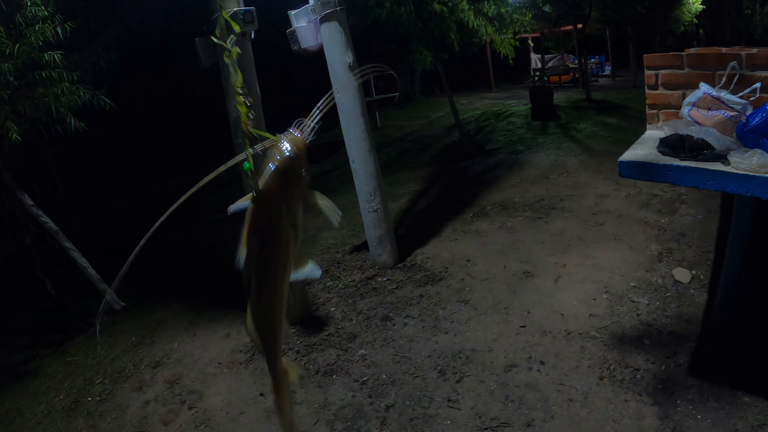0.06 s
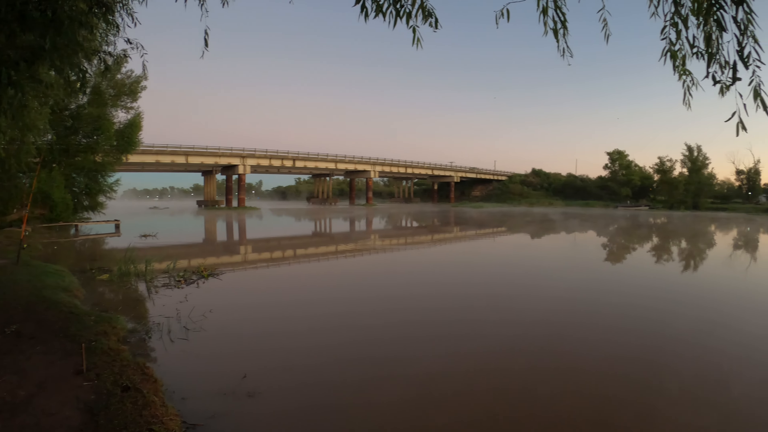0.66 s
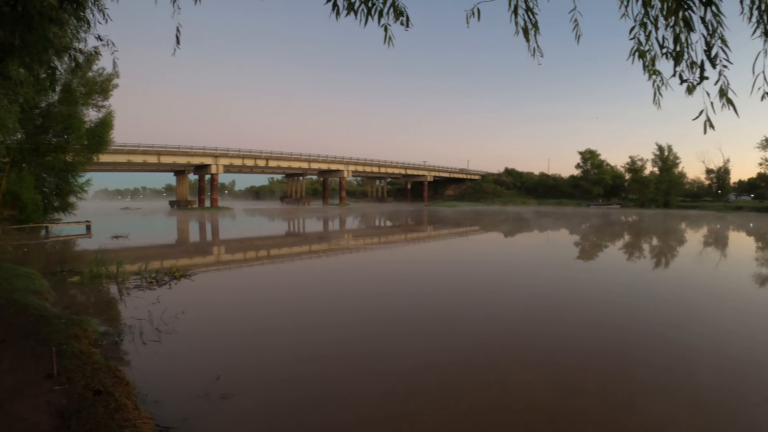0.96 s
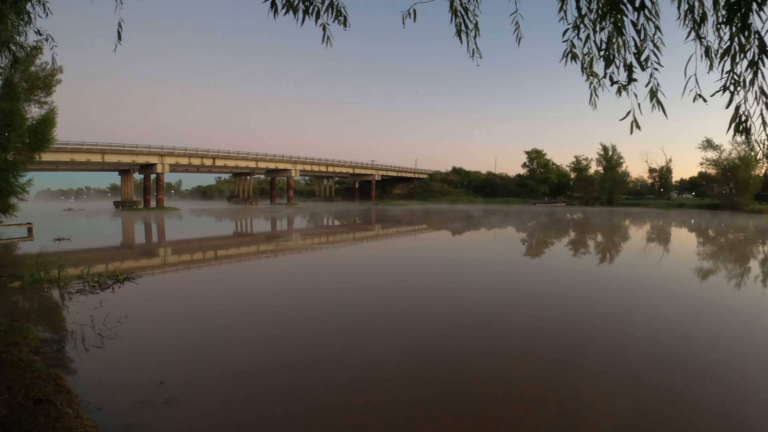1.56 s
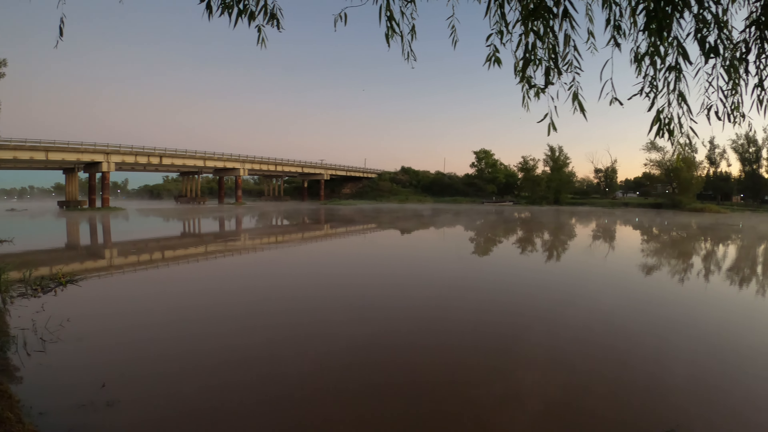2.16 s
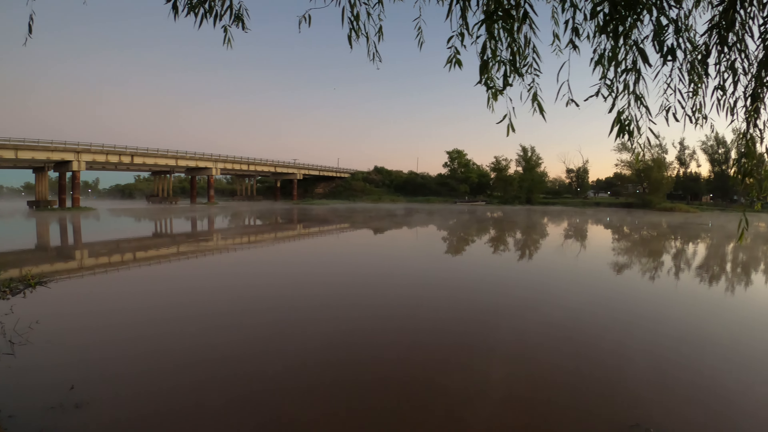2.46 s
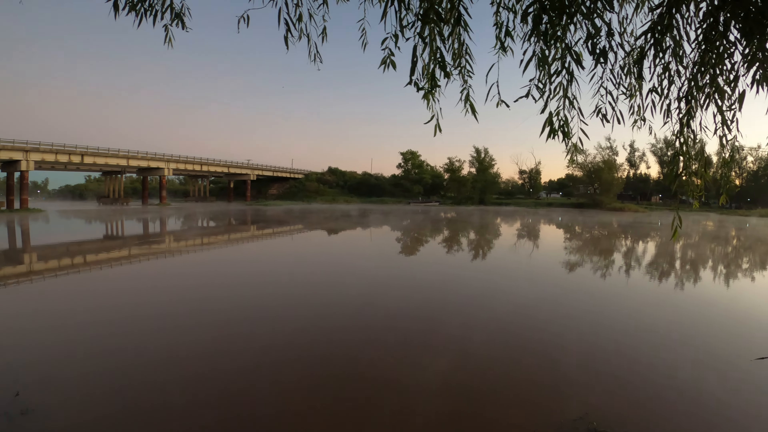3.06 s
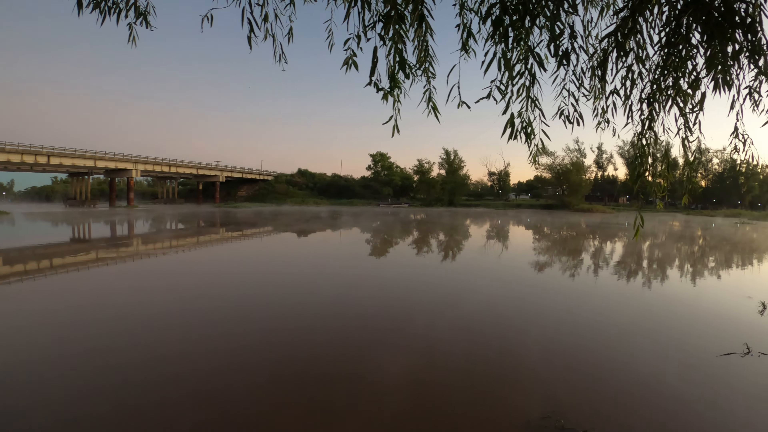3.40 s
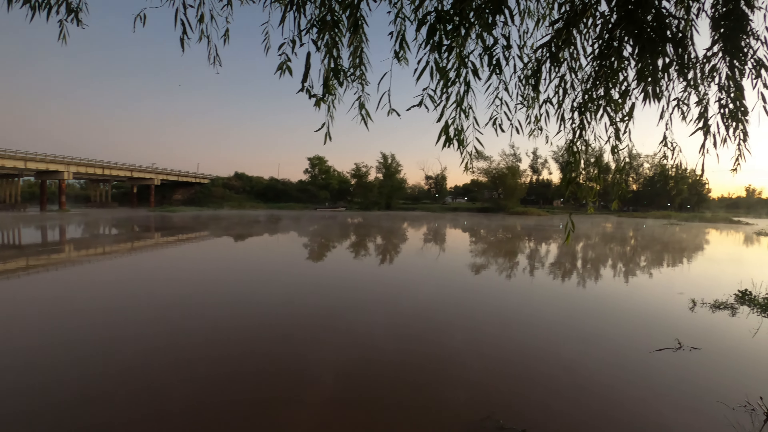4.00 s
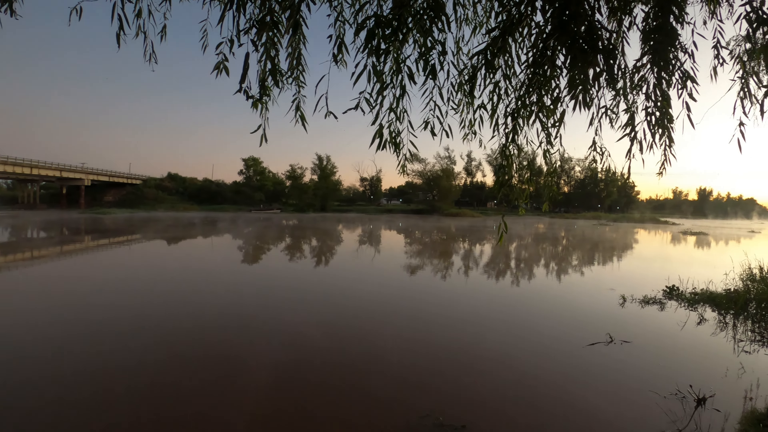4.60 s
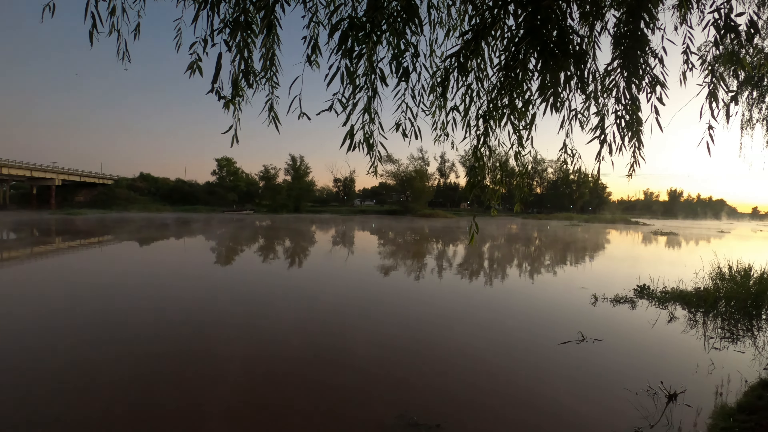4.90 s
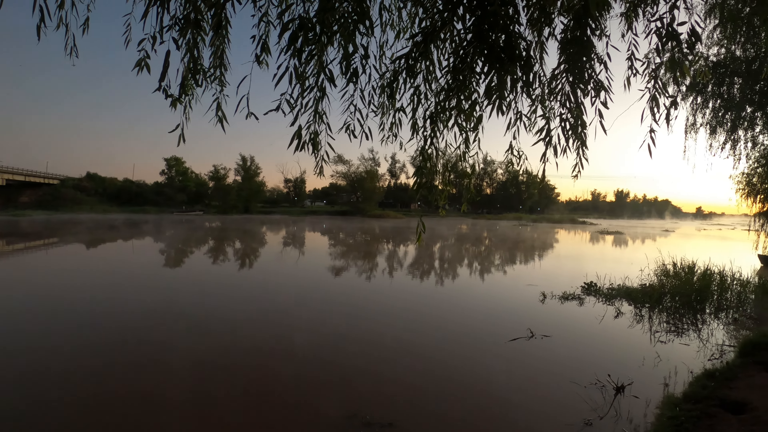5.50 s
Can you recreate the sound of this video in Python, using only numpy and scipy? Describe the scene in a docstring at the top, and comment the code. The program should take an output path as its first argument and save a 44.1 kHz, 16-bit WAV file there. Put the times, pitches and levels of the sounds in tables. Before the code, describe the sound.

A brief, deep rumble of close traffic cuts abruptly to a quieter riverbank. There a flock of small birds chatters continuously in the trees, with quick high chirps, raspy scolding calls and a few thin, clear whistles. Far traffic on a bridge adds a steady low rumble, engine drone and tyre hiss. Near the end the microphone is softly bumped twice.

```python
"""A river at dawn. A moment of close traffic rumble cuts to the bank, where a flock of small birds
chatters and scolds in the trees and a few others whistle thin, clear notes. Each note is a gliding
syrinx tone scattered by trunks and leaves; the scolds are high, patchy noise. Far traffic on a bridge
gives a low rumble, an engine drone and a tyre hiss. Late on, the microphone is bumped softly twice."""
import sys
import numpy as np
from scipy import signal
from scipy.fft import rfft, irfft, next_fast_len
from scipy.io import wavfile
from scipy.ndimage import uniform_filter1d

SR = 44100
rng = np.random.default_rng(int(sys.argv[2]) if len(sys.argv) > 2 else 0)


def dump(signal):
    """Clip the signal to [-1, 1] and save it as 16-bit WAV at the path in sys.argv[1]."""
    limited = np.clip(np.atleast_2d(signal).T, -1, 1)
    pcm = np.round(limited * 32767).astype(np.int16)
    wavfile.write(sys.argv[1], SR, pcm)


N = 249165
TIME = np.arange(N) / SR


def from_db(db):
    """Decibels to gain."""
    return 10 ** (np.asarray(db) / 20)


def unit_rms(x):
    """Scale to rms 1."""
    return x / np.sqrt(np.mean(x ** 2) + 1e-20)


def curves(rows):
    """Rows of (t/s, values...) to one per-sample curve for each value column."""
    times_s, *columns = np.transpose(rows)
    return [np.interp(TIME, times_s, column) for column in columns]


def add(out, start_s, sound):
    """Mix a sound in at start_s."""
    at = max(int(start_s * SR), 0)
    out[at:at + len(sound)] += sound[:max(N - at, 0)]


def band(x, low_hz, high_hz):
    """Butterworth band-pass."""
    return signal.sosfilt(signal.butter(2, [low_hz, high_hz], "band", fs=SR, output="sos"), x)


def coloured_noise(spectrum):
    """Steady noise shaped by rows of (f/Hz, density/dB); rms 1."""
    hz, db = np.transpose(spectrum)
    size = next_fast_len(N)
    bins_hz = np.maximum(np.fft.rfftfreq(size, 1 / SR), 1)
    gain = from_db(np.interp(np.log(bins_hz), np.log(hz), db, left=-120, right=-120))
    return unit_rms(irfft(rfft(rng.standard_normal(size)) * gain, size)[:N])


def drift(rate_hz):
    """Random line through rate_hz knots a second; rms 1."""
    knots = rng.standard_normal(N // 8)
    return unit_rms(np.interp(TIME * rate_hz, np.arange(len(knots)), knots))


def sine(pitch_hz):
    """Sine following a pitch curve; rms 1."""
    return np.sqrt(2) * np.sin(2 * np.pi * np.cumsum(pitch_hz) / SR)


# Close traffic spectrum: f/Hz, relative density/dB
CLOSE_SPECTRUM = [(15, -20), (25, -6), (45, 2), (70, -6.5), (100, -11.5), (140, -5), (190, -13.5),
                  (300, -16.5), (450, -31.5), (700, -26.5), (950, -31.5), (1500, -39), (2600, -47),
                  (4000, -54.5), (6400, -67.5), (8000, -72), (10000, -105)]


def close_traffic(level_db=-24.5):
    """Nearby traffic: steady noise, strongest in the deep bass."""
    return from_db(level_db) * coloured_noise(CLOSE_SPECTRUM)


def syllable(length_s, start_hz, middle_hz, end_hz, edge):
    """Parabolic pitch and tapered swell of one note; edge is each taper's share of the length."""
    progress = np.linspace(0, 1, int(length_s * SR))
    parabola = np.polyfit([0, .5, 1], [start_hz, middle_hz, end_hz], 2)
    swell = unit_rms(signal.windows.tukey(len(progress), 2 * edge))
    return np.polyval(parabola, progress), swell


def syrinx(notes, flutter_hz, shimmer_db, second_db, third_db, edge):
    """Gliding tones with two weak overtones; rasp makes pitch and strength flutter."""
    out, quiver, shimmer = np.zeros(N), drift(700), np.tanh(drift(450))
    for start_s, length_s, start_hz, middle_hz, end_hz, level_db, rasp in notes:
        pitch_hz, swell = syllable(length_s, start_hz, middle_hz, end_hz, edge)
        stretch = (rng.integers(N) + np.arange(len(pitch_hz))) % N
        unsteadiness = .15 + .85 * rasp ** 2   # even the clearest note quivers a little
        phase = 2 * np.pi * np.cumsum(pitch_hz + flutter_hz * unsteadiness * quiver[stretch]) / SR
        tone = np.sin(phase)
        tone += from_db(second_db) * np.sin(2 * phase) + from_db(third_db) * np.sin(3 * phase)
        tone *= from_db(shimmer_db * np.sqrt(rasp) * shimmer[stretch])
        add(out, start_s, from_db(level_db) * swell * unit_rms(tone))
    return out


def trees(calls, t60_s, wet_db):
    """Trunks and leaves scatter a dense, short tail, duller than the call."""
    t = TIME[:SR]
    envelope = from_db(-60 * t / t60_s) * (1 - np.exp(-t / .0017))
    tail = band(rng.standard_normal(SR), 800, 10000) * envelope
    tail /= np.sqrt(np.sum(tail ** 2) * SR / (2 * 8200))   # about unit gain in the passband
    return calls + from_db(wet_db) * signal.fftconvolve(calls, tail)[:N]


# Syllable shapes by name: start f / middle f, end f / middle f, rasp (0-1)
SYLLABLE_SHAPES = {"arch": (.89, 0.81, 0.59), "buzz": (0.75, 0.74, 0.928), "slur": (1.02, .88, 0.625),
                   "fall": (1.12, .88, .52), "rise": (0.8, 1.08, .45), "scoop": (1, 1.3, 0.34),
                   "sweep": (.82, 1.02, .15)}
# Nearest birds' chirps: t/s, length/s, middle f/Hz, level/dB, syllable name
NEAR_CHIRPS = [(0.379, .05, 5200, -55.5, "arch"), (0.408, .033, 6700, -59.5, "arch"),
               (0.437, 0.0522, 3884, -40.5, "arch"), (.44, .04, 4300, -47, "slur"),
               (0.479, .035, 3280, -44, "slur"), (0.501, .041, 3670, -43.5, "slur"),
               (0.613, 0.042, 4480, -51.5, "buzz"), (0.648, 0.029, 3850, -46.5, "slur"),
               (0.696, 0.036, 3530, -48.5, "fall"), (0.775, 0.066, 5390, -53.5, "arch"),
               (.84, 0.052, 4240, -43, "slur"), (0.903, 0.058, 3450, -44.5, "buzz"),
               (0.957, 0.038, 3170, -40, "scoop"), (0.962, .07, 5750, -58.5, "slur"),
               (0.984, 0.073, 4000, -45.5, "slur"), (1.049, 0.055, 3190, -45, "rise"),
               (1.057, 0.083, 4340, -51, "buzz"), (1.143, .06, 4090, -50, "buzz"),
               (1.216, .024, 3000, -44, "scoop"), (1.216, 0.041, 6080, -50, "arch"),
               (1.24, .08, 4380, -47.5, "sweep"), (1.283, 0.038, 6020, -53.5, "arch"),
               (1.309, .028, 4350, -40.5, "slur"), (1.37, 0.029, 3150, -48, "scoop"),
               (1.39, .06, 5600, -58, "fall"), (1.393, 0.056, 4400, -39, "sweep"),
               (1.515, 0.052, 4400, -50.5, "rise"), (1.551, 0.032, 3610, -47.5, "fall"),
               (1.599, 0.046, 4100, -48.5, "arch"), (1.643, .099, 3690, -50, "fall"),
               (1.758, 0.039, 4360, -43.5, "slur"), (1.811, .065, 3530, -44.5, "arch"),
               (1.836, 0.032, 4730, -43, "arch"), (1.909, 0.037, 3640, -46, "rise"),
               (2.053, 0.052, 4050, -49.5, "slur"), (2.114, 0.054, 3590, -47.5, "arch"),
               (2.2, .04, 4900, -59.5, "arch"), (2.27, .06, 5200, -54, "buzz"),
               (2.305, 0.037, 3600, -50, "slur"), (2.331, 0.06, 4850, -52.5, "slur"),
               (2.365, 0.055, 3700, -55, "buzz"), (2.417, 0.039, 3750, -48, "buzz"),
               (2.591, 0.072, 4120, -49.5, "arch"), (2.653, 0.076, 5150, -56, "buzz"),
               (2.66, .069, 3510, -54, "slur"), (2.762, 0.049, 3760, -50, "rise"),
               (2.876, 0.068, 3670, -49.5, "arch"), (2.893, 0.038, 5160, -47.5, "arch"),
               (2.925, 0.063, 4400, -50.5, "buzz"), (2.948, 0.021, 3680, -45, "rise"),
               (2.968, .03, 3550, -46, "slur"), (2.993, .028, 2950, -46.5, "scoop"),
               (3.027, .033, 3290, -48.5, "arch"), (3.103, 0.065, 5310, -54.5, "buzz"),
               (3.21, 0.035, 3850, -50.5, "rise"), (3.24, 0.049, 4420, -49, "fall"),
               (3.295, 0.03, 3460, -47, "arch"), (3.33, 0.031, 3130, -46.5, "scoop"),
               (3.389, 0.049, 4370, -48.5, "buzz"), (3.447, 0.07, 3620, -52, "buzz"),
               (3.535, .04, 4060, -54.5, "fall"), (3.624, 0.11, 3820, -48.5, "buzz"),
               (3.728, 0.0484, 3530, -47.5, "sweep"), (3.785, 0.041, 5270, -53, "arch"),
               (3.784, 0.06, 3900, -46.5, "arch"), (3.829, 0.08, 3490, -45, "slur"),
               (3.995, 0.046, 3850, -57.5, "arch"), (4.1, 0.044, 4040, -50.5, "arch"),
               (4.149, .031, 3460, -43.5, "scoop"), (4.175, 0.052, 4940, -55, "buzz"),
               (4.214, 0.029, 5150, -49, "arch"), (4.274, 0.054, 3810, -44.5, "slur"),
               (4.291, .044, 6000, -59.5, "slur"), (4.323, 0.054, 3200, -44.5, "slur"),
               (4.385, 0.036, 4200, -50, "slur"), (4.43, 0.038, 5000, -49.5, "arch"),
               (4.432, .07, 3600, -54.5, "buzz"), (4.523, 0.027, 3620, -45, "arch"),
               (4.546, 0.029, 3000, -45.5, "slur"), (4.626, 0.11, 3720, -51, "buzz"),
               (4.665, 0.081, 4930, -52, "arch"), (4.75, .083, 3660, -50, "buzz"),
               (4.827, 0.049, 3040, -45.5, "scoop"), (4.965, 0.033, 3310, -50, "fall"),
               (5.091, 0.042, 4350, -51.5, "sweep"), (5.121, 0.042, 3350, -48, "fall"),
               (5.175, 0.03, 3280, -49.5, "slur"), (5.286, .033, 3200, -52.5, "slur"),
               (5.349, .026, 3580, -50, "sweep"), (5.429, 0.066, 5170, -56, "arch"),
               (5.489, 0.082, 4380, -49.5, "arch"), (5.51, 0.046, 3280, -53, "rise"),
               (5.561, 0.043, 3520, -48.5, "arch")]


def near_flock():
    """The closest birds of the flock, heard through foliage."""
    notes = []
    for start_s, length_s, middle_hz, level_db, shape in NEAR_CHIRPS:
        start_ratio, end_ratio, rasp = SYLLABLE_SHAPES[shape]
        start_hz, end_hz = start_ratio * middle_hz, end_ratio * middle_hz
        notes.append((start_s, length_s, start_hz, middle_hz, end_hz, level_db, rasp))
    calls = syrinx(notes, flutter_hz=350, shimmer_db=4.5, second_db=-35, third_db=-48, edge=.22)
    return trees(calls, t60_s=.2, wet_db=-3)


# Far flock's slow swell, with one lull: t/s, level/dB
FAR_FLOCK_SWELL = [(.42, -47), (.52, -49), (.59, -53.5), (.72, -52), (.9, -50), (1.3, -50), (1.85, -45.5),
                   (2.05, -51.5), (2.42, -46.5), (2.55, -65), (2.66, -51), (2.95, -47), (3.55, -54.5),
                   (4.35, -47), (5.05, -53), (5.65, -54)]


def far_flock_level_db(near_calls, window_s=.062, share=.28):
    """Far birds join in with near ones: a slow swell plus a share of the near birds' swing in dB."""
    slow_db, = curves(FAR_FLOCK_SWELL)
    near_power = uniform_filter1d(near_calls ** 2, int(window_s * SR))
    near_db = 10 * np.log10(near_power + from_db(-59.5) ** 2)
    return slow_db + share * (near_db - near_db.mean())


def far_flock(level_db, count=520):
    """Many more birds chirp at random and blur together."""
    jitter, length, pitch, rise, fall, faintness, rasp = rng.random((count, 7)).T
    start_s = (np.arange(count) + jitter) / count * N / SR   # one chirp per time slot
    length_s = .02925 + .0483 * length
    middle_hz = 3150 * 1.55 ** (pitch ** 1.5)
    start_hz = middle_hz * (1.04 - .25 * rise)
    end_hz = middle_hz * (1.04 - .23 * fall)
    notes = zip(start_s, length_s, start_hz, middle_hz, end_hz, -6 * faintness, rasp)
    calls = syrinx(notes, flutter_hz=400, shimmer_db=5, second_db=-31, third_db=-46, edge=.3)
    return from_db(level_db) * unit_rms(trees(calls, t60_s=.078, wet_db=-2))


# Spectrum of the harsh calls: f/Hz, relative density/dB
SCOLD_SPECTRUM = [(4000, -6.5), (5000, 17), (6000, 9), (7200, 0.5), (8200, -5.5), (9200, -17.5),
                  (10500, -10.5), (12000, -32), (13500, -27), (15500, -38)]
# Harsh calls: t/s, length/s, level/dB, tilt/(dB/octave)
SCOLD_CALLS = [(0.384, 0.069, -54, 0), (0.775, 0.06, -55.5, -1), (.955, 0.06, -55, 8),
               (1.007, 0.21, -58.5, 9), (1.196, 0.22, -51.5, -3), (1.81, 0.042, -55.5, 3),
               (2.244, .17, -64, 6), (2.86, 0.079, -56, 0), (2.933, 0.076, -51, -1),
               (3.187, .07, -54.5, -3), (3.37, .04, -53, -2), (3.737, 0.075, -53.5, 4),
               (3.998, 0.15, -58.5, 7), (4.168, 0.2, -60.5, 3), (4.545, 0.12, -57.5, 0),
               (5.073, 0.069, -60, -2), (5.44, .06, -59.5, 5), (5.622, .04, -55, -3)]


def scolding(flock_db, attack_s=.012, release_s=.045, patchy_db=6):
    """Harsh calls: a noisy top above the notes that flares in narrow bands and brightens when loud."""
    power = from_db(flock_db - 15.5) ** 2   # the far flock's own harsh top
    weighted_tilt = 0
    for start_s, length_s, call_db, call_tilt in SCOLD_CALLS:
        attack = np.clip((TIME - start_s) / attack_s, 0, 1)
        release = np.exp(-np.maximum(TIME - start_s - length_s, 0) / release_s)
        call_power = (from_db(call_db) * attack * release) ** 2
        power += call_power
        weighted_tilt += call_tilt * call_power
    level_db = 10 * np.log10(power)
    tilt_db_per_octave = weighted_tilt / power + .17 * (level_db - level_db.mean())
    edges_hz = np.geomspace(4000, 15500, 29)
    white, hiss = rng.standard_normal((2, N)), np.zeros(N)
    hz, db = np.transpose(SCOLD_SPECTRUM)
    for k, (low_hz, high_hz) in enumerate(zip(edges_hz, edges_hz[1:])):
        centre_hz = np.sqrt(low_hz * high_hz)
        colour_db = np.interp(centre_hz, hz, db) + tilt_db_per_octave * np.log2(centre_hz / 6200)
        hiss += band(white[k % 2], low_hz, high_hz) * from_db(colour_db + patchy_db * drift(26))
    return from_db(level_db) * unit_rms(hiss)


# Engine orders: f/Hz, level/dB
ENGINE_ORDERS = [(57, -47), (80, -44.5), (113.5, -42.5), (140.5, -43), (188, -56.5), (228, -58.5)]


def engine_drone(waver_db=2.25, waver_hz=1.75):
    """Far engines: low tones, each wavering in level and pitch."""
    return sum(from_db(level_db + waver_db * drift(7.6)) * sine(hz + waver_hz * drift(10))
               for hz, level_db in ENGINE_ORDERS)


# Tyre hiss of passing vehicles: t/s, level/dB, centre f/Hz
TYRE_PASSES = [(0.42, -44, 946), (2.3, -46.5, 1204), (4.72, -48.5, 1074), (4.82, -43, 904),
               (5.08, -43.5, 1085), (5.23, -44, 906), (5.65, -42.5, 826)]


def tyre_hiss():
    """A flickering hump of tyre noise whose centre moves as vehicles pass."""
    level_db, centre_hz = curves(TYRE_PASSES)
    edges_hz = np.geomspace(450, 3000, 10)
    white, hiss = rng.standard_normal((2, N)), np.zeros(N)
    for k, (low_hz, high_hz) in enumerate(zip(edges_hz, edges_hz[1:])):
        octaves_off = np.log2(np.sqrt(low_hz * high_hz) / centre_hz)
        hiss += band(white[k % 2], low_hz, high_hz) * from_db(-13 * octaves_off ** 2 + 1.13 * drift(8.7))
    return from_db(level_db) * unit_rms(hiss)


# Far traffic's rumble spectrum: f/Hz, relative density/dB
RUMBLE_SPECTRUM = [(20, -19), (30, -5.5), (55, -4.5), (100, 0), (150, -7.5), (200, -13), (260, -14.5),
                   (400, -41.5)]
# Far traffic's low-mid body spectrum: f/Hz, relative density/dB
BODY_SPECTRUM = [(150, 8), (280, 0), (400, -2), (600, -5), (900, -8), (1600, -18.5), (2500, -40.5)]
# Far traffic levels: t/s, rumble/dB, body/dB, upper tyre hiss/dB
BRIDGE_LEVELS = [(.45, -38, -45, -51.5), (1.5, -38.5, -45.5, -52), (2.4, -39.5, -45.5, -61.5),
                 (4.1, -38.5, -48.5, -56), (5.3, -34.5, -43, -57), (5.65, -36.5, -44, -54.5)]


def bridge_traffic():
    """Far vehicles on the bridge: slowly swelling rumble, engines and tyres."""
    rumble_db, body_db, upper_db = curves(BRIDGE_LEVELS)
    rumble = from_db(rumble_db) * coloured_noise(RUMBLE_SPECTRUM)
    body = from_db(body_db) * coloured_noise(BODY_SPECTRUM)
    engines, tyres = engine_drone(), tyre_hiss()
    upper_hiss = from_db(upper_db) * unit_rms(band(rng.standard_normal(N), 1810, 3290))
    return rumble + body + engines + tyres + upper_hiss


# Open-air background spectrum: f/Hz, relative density/dB
AIR_SPECTRUM = [(600, -0.5), (1500, 3.5), (2300, -3.5), (3500, 0.5), (5000, -7), (7000, -16.5),
                (10000, -31.5), (13000, -57), (15500, -56)]


def air(level_db=-52.5):
    """Faint, steady hiss on the bank."""
    return from_db(level_db) * coloured_noise(AIR_SPECTRUM)


# Clear whistles: t/s, length/s, start f/Hz, middle f/Hz, end f/Hz, level/dB
WHISTLE_NOTES = [(0.565, 0.046, 8400, 8400, 8100, -71), (1.71, 0.13, 2540, 2660, 2660, -50),
                 (1.84, .06, 2700, 2710, 2700, -56), (2.417, 0.034, 6400, 6020, 5740, -55),
                 (2.64, 0.18, 3000, 2610, 2410, -58.5), (3.132, .15, 8600, 8100, 8000, -75),
                 (4.746, 0.082, 5370, 6150, 6050, -57.5), (5.153, 0.13, 6220, 6680, 6100, -66),
                 (5.415, .065, 2850, 2590, 2380, -57), (5.478, 0.073, 2350, 2440, 2830, -55)]
# One bird's run of thin upslurs: t/s, length/s, top f/Hz, level/dB
UPSLUR_NOTES = [(4.433, .02, 5700, -57), (4.495, .03, 5800, -55), (4.862, .034, 6300, -55),
                (4.922, .028, 6300, -54.5), (4.985, .022, 5700, -60), (5.288, .028, 6400, -58.5),
                (5.343, .025, 6000, -58.5), (5.42, .016, 5700, -58.5), (5.612, .027, 5650, -56)]


def whistlers(upslur_start_hz=5400, climb_by_middle=.62):
    """Thin, nearly pure notes with a slight quaver, from birds in the open; the trees add a tail."""
    out, quaver_hz = np.zeros(N), 45 * drift(260)
    notes = list(WHISTLE_NOTES)
    for start_s, length_s, top_hz, level_db in UPSLUR_NOTES:
        middle_hz = upslur_start_hz + climb_by_middle * (top_hz - upslur_start_hz)
        notes.append((start_s, length_s, upslur_start_hz, middle_hz, top_hz, level_db))
    for start_s, length_s, start_hz, middle_hz, end_hz, level_db in notes:
        pitch_hz, swell = syllable(length_s, start_hz, middle_hz, end_hz, edge=.083)
        pitch_hz += np.roll(quaver_hz, rng.integers(N))[:len(pitch_hz)]
        add(out, start_s, from_db(level_db) * swell * sine(pitch_hz))
    shimmer = from_db(1.5 * drift(120))
    return trees(out * shimmer, t60_s=.3, wet_db=-6)


# Bumps on the microphone: t/s, thud gain/dB, tick gain/dB
MIC_BUMPS = [(5.043, -21.5, -36), (5.142, -26, -49)]


def microphone_bumps(thud_t60_s=.18, tick_t60_s=.073, thud_rise_s=.0097):
    """Each soft knock gives a low thud and a faint, dull tick, both decaying noise."""
    out, t = np.zeros(N), TIME[:SR // 2]
    for start_s, thud_db, tick_db in MIC_BUMPS:
        thud_noise, tick_noise = rng.standard_normal((2, len(t)))
        thud_envelope = from_db(-60 * t / thud_t60_s) * (1 - np.exp(-t / thud_rise_s))
        thud = unit_rms(band(thud_noise, 45, 230)) * thud_envelope
        tick = unit_rms(band(tick_noise, 300, 2400)) * from_db(-60 * t / tick_t60_s)
        add(out, start_s, from_db(thud_db) * thud + from_db(tick_db) * band(tick, 200, 2600))
    return out


def scene(cut_s=.385, crossfade_s=.0002):
    """Close traffic, then a hard cut to the river bank; mono."""
    near_calls = near_flock()
    flock_db = far_flock_level_db(near_calls)
    birds = near_calls + far_flock(flock_db) + scolding(flock_db) + whistlers()
    bank = birds + bridge_traffic() + microphone_bumps() + air()
    at_bank = np.clip((TIME - cut_s) / crossfade_s + .5, 0, 1)
    return (at_bank * bank + (1 - at_bank) * close_traffic())[None]


def record(dry):
    """Short fades at both ends, then a steep low-pass."""
    fade_s, stopband_hz = .003, 15500
    fade = np.clip(np.minimum(TIME, TIME[::-1]) / fade_s, 0, 1)
    return signal.sosfilt(signal.cheby2(12, 60, stopband_hz, fs=SR, output="sos"), dry * fade)


dry = scene()
out = record(dry)
dump(out)
```